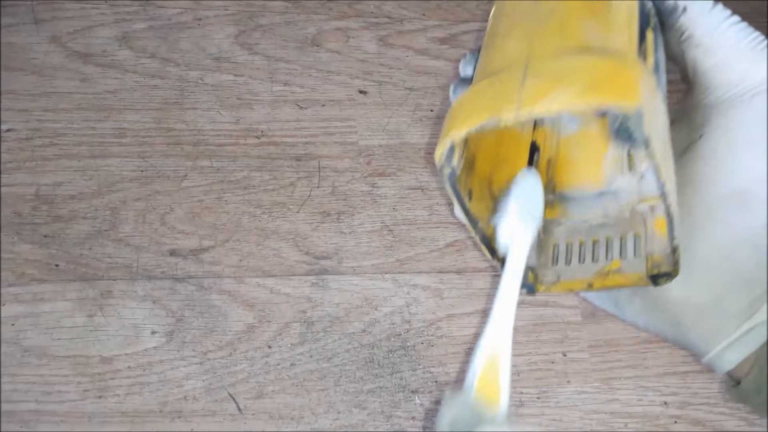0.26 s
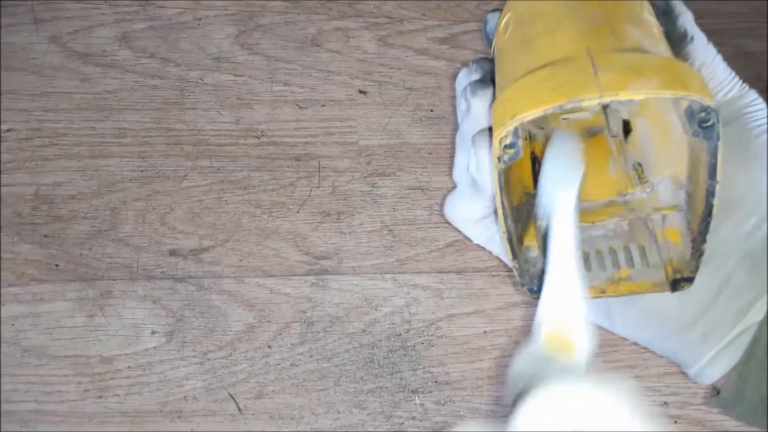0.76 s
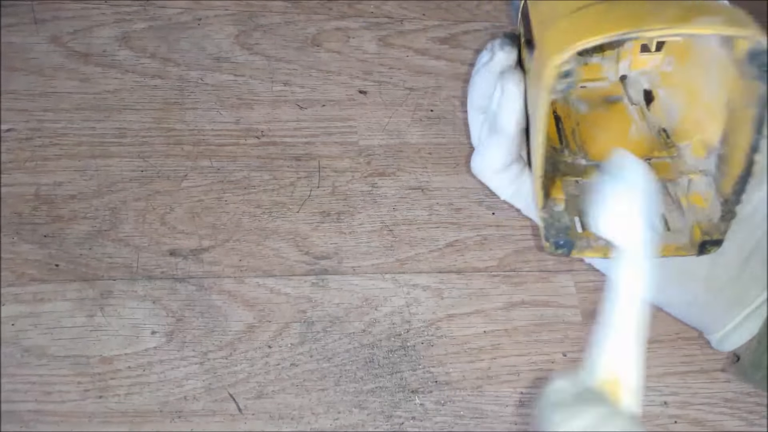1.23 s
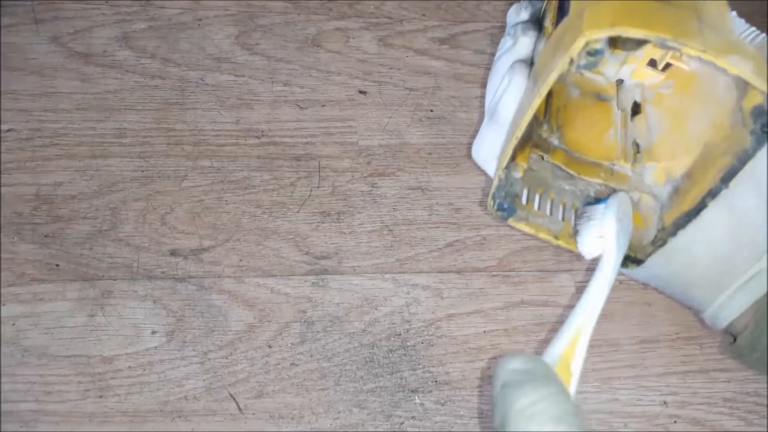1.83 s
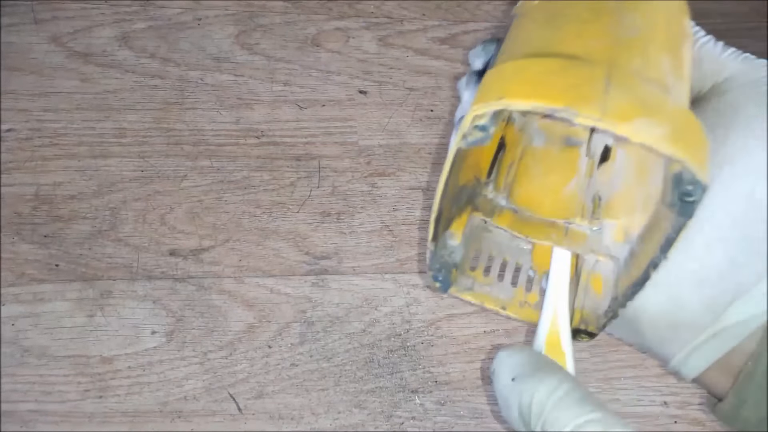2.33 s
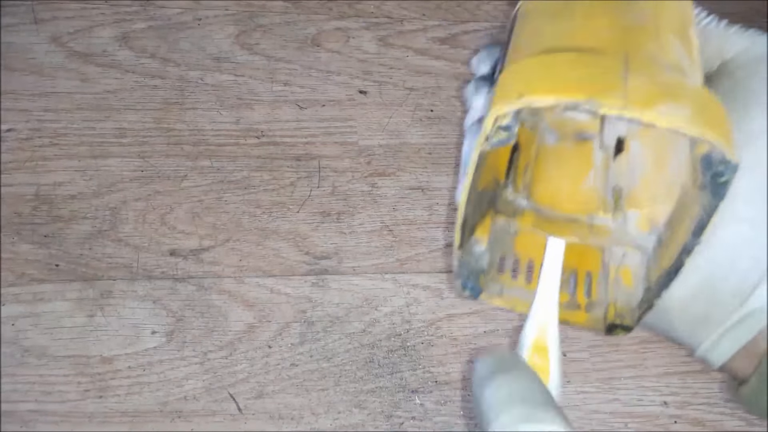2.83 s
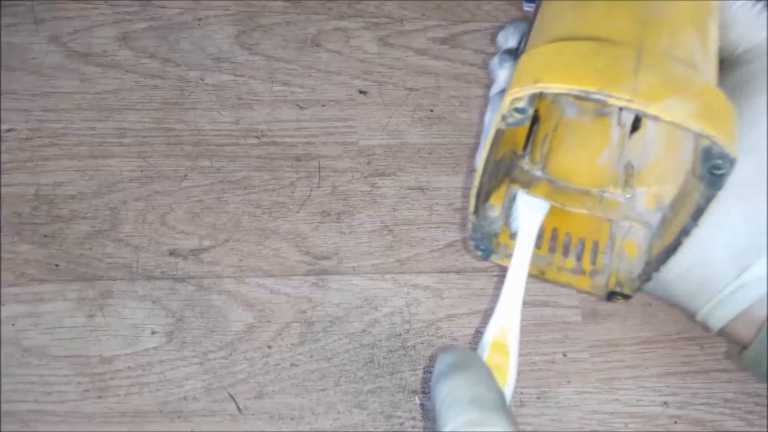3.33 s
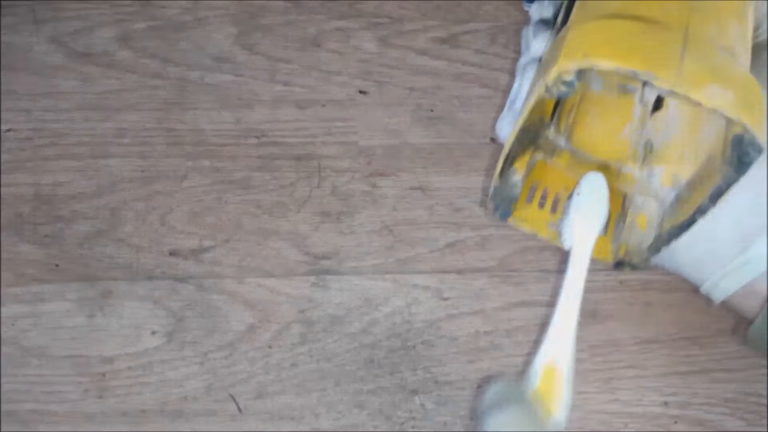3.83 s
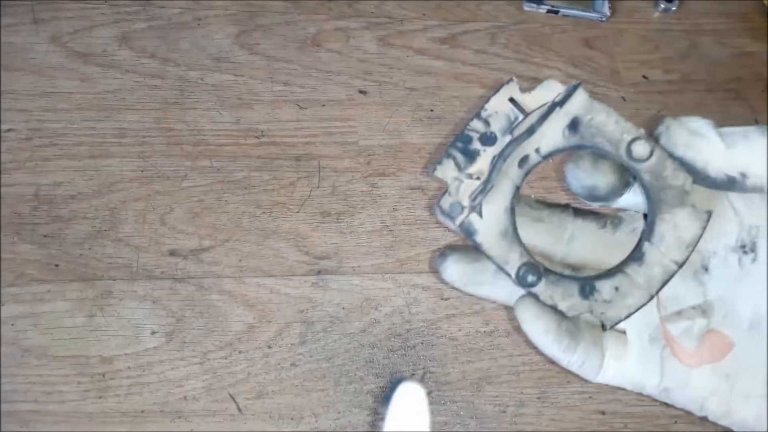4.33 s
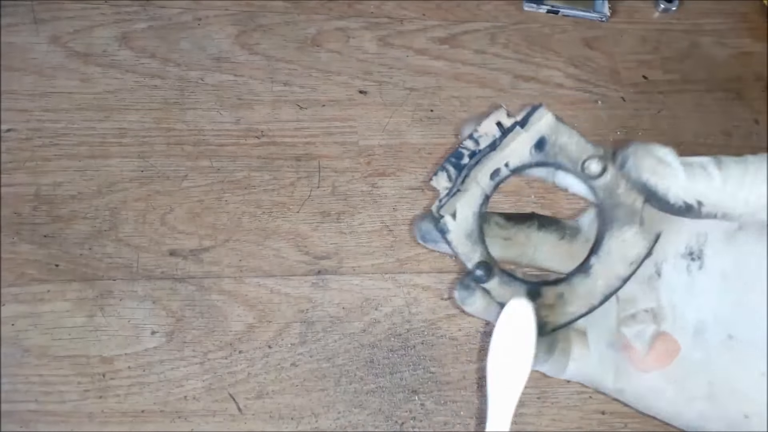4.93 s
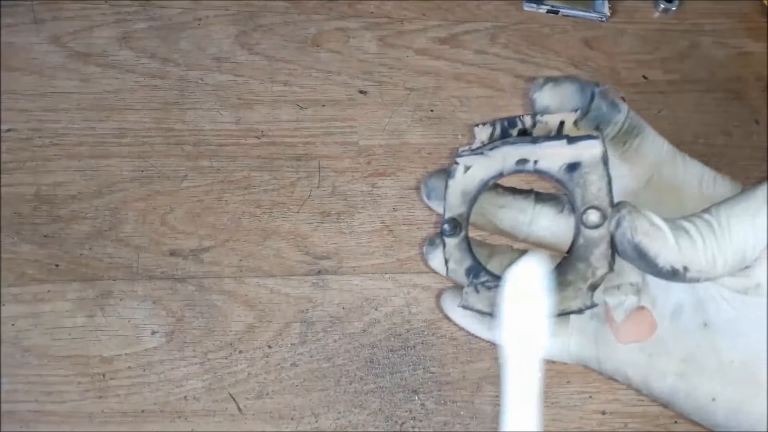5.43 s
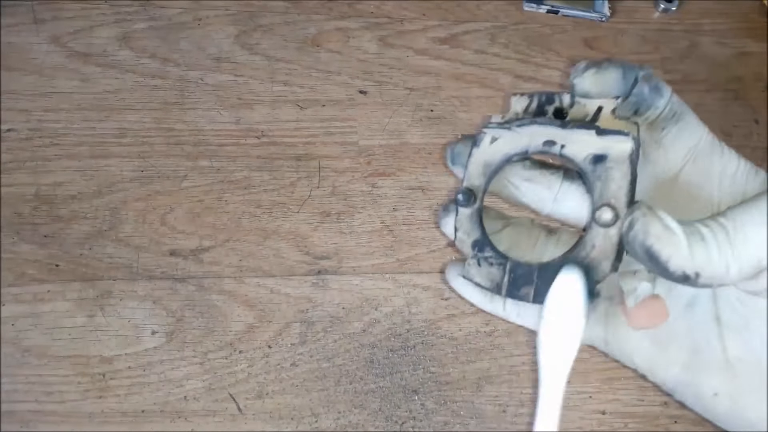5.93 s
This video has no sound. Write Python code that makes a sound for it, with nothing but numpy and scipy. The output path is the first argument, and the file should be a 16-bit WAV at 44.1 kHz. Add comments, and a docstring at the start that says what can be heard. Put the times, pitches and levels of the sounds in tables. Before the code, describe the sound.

From the start, a toothbrush scrubs inside a hollow plastic drill housing, close by, in quick, uneven back-and-forth strokes, bright and scratchy, dotted with clicks as the brush head knocks and snags. A sharp knock comes at about 0.6 seconds and a bright clack of the brush neck at 1 second. A faint, low machine hum in the distance fades by 1.5 seconds. The strokes ease briefly, then continue along the rim from about 1.9 seconds, with a sharp click at 2.5 and the strongest knock near 3.9. At about 4.3 seconds the scrubbing stops, leaving very soft glove rubs and a tiny handling tick. From 5.2 seconds to the end, just after 6, the brush works on a small flat part in quieter, even, thin hissing strokes, about seven a second, with a few light ticks. Faint workshop air lies underneath, with little echo.

```python
"""A toothbrush scrubs a plastic drill housing held in a gloved hand: first deep inside, then along the rim.
Stick-slip friction of the bristles excites the housing's modes; the brush head knocks or snags, and once
the brush neck slaps an edge and rings. After a pause the brush scrubs a small flat part, which mostly
hisses. A part ticks in the hand, the glove rubs softly; behind lie workshop air and a far machine hum."""
import sys
import numpy as np
from scipy import signal
from scipy.fft import rfft, irfft, next_fast_len
from scipy.io import wavfile

SR = 44100
rng = np.random.default_rng(int(sys.argv[2]) if len(sys.argv) > 2 else 0)


def output_pcm(signal):
    """Save a mono or channel-first signal as 16-bit PCM at the path in sys.argv[1].

    Samples are clipped to [-1, 1] before scaling.
    """
    pcm = np.clip(np.atleast_2d(signal).T, -1, 1) * 32767
    wavfile.write(sys.argv[1], SR, np.round(pcm).astype(np.int16))


N = 272538
T = np.arange(N) / SR
RIM_FROM_S, PART_FROM_S = 1.85, 4.5

# Contact shapes the spectrum: push is the gain at 1.6-3.7 kHz, sizzle the gain above 12 kHz.
# strokes on the housing: (time of peak speed [s], length [s], level [dB], push [dB])
HOUSING_STROKES = [(.015, .028, -39.5, 0), (0.073, 0.058, -40.5, -3), (.135, 0.048, -47.5, 0),
                   (.211, 0.085, -37.5, 1), (0.377, 0.066, -39.5, 1), (0.479, .05, -55.5, -2),
                   (0.625, .048, -29.5, -4.5), (.685, .07, -48, -6), (.796, .062, -34, 2.5),
                   (.92, .045, -38, -3), (.958, .042, -34, 4), (1.076, 0.065, -33.5, 2),
                   (1.21, .062, -37.5, -4), (1.329, 0.17, -51, -4.5), (1.468, 0.029, -50, -2),
                   (1.691, .025, -44.5, 4.5), (1.859, .1, -58, -1), (1.936, 0.046, -44.5, 3.5),
                   (1.989, .07, -53, 2.5), (2.11, 0.088, -44, 5.5), (2.285, 0.051, -36, 2.5),
                   (2.356, 0.067, -50.5, 3), (2.533, .05, -30, -3), (2.618, .07, -35, 3),
                   (2.72, 0.077, -56.5, -12), (2.86, .04, -53, -7), (2.949, .05, -33.5, -6),
                   (3.012, .04, -31.5, -6.5), (3.082, .036, -37.5, 0.5), (3.17, .026, -41, -1),
                   (3.207, .048, -42, 0), (3.257, .021, -38, 8.5), (3.298, 0.034, -50.5, 3),
                   (3.464, 0.05, -33.5, 3), (3.552, .09, -51.5, -4), (3.657, .088, -44, 1),
                   (3.803, .076, -35.5, 3.5), (3.956, 0.053, -32, -4), (4.093, .044, -40.5, 3.5),
                   (4.235, .06, -43, 0)]
# friction on each surface:
# (share of a stroke spent speeding up [1], drag [dB], sizzle at 0 dB push [dB], sizzle per push [dB/dB])
HOUSING_FRICTION, PART_FRICTION = (.49, -21.5, -2.2, .3), (.37, -28, 1, .8)
# sharp knocks and ticks: the brush head knocks or snags, or a part ticks in the hand:
# (time [s], level over 1 ms [dB], chatter decay [s], push [dB], sizzle [dB])
KNOCKS_AND_TICKS = [(.3014, -32.5, .008, 6, 2), (0.358, -28.5, 0.0076, -1, -8), (.451, -35, .006, 1.5, 3),
                    (.4901, -43, .003, -13, -5.5), (.563, -35, 0.0046, 0, 0), (.6062, -21.5, .002, -18, -2),
                    (.6316, -6.5, .0022, -2.5, -5), (.7505, -28, .0009, -18, -4),
                    (0.8747, -34, .002, -16, -1), (.8978, -31, .0025, -10, -4.5),
                    (1.0698, -18, .006, -16, -12), (1.1602, -34, .003, -10, -7),
                    (1.1788, -30, .0019, -9, -13), (1.3242, -33, .0007, -8, -12),
                    (1.5505, -40, .0011, 12, 5), (1.7286, -37, .0041, 9.5, -4), (1.8012, -33, .003, 14, -4),
                    (1.8052, -25, .003, 11, -14), (1.8267, -29.5, .0004, -9, -7),
                    (2.1714, -36, .0021, 6, 1), (2.5432, -14.5, .003, 0, 8), (2.6192, -25, .005, -14, 8),
                    (2.6452, -28, .0008, 13, -6), (2.856, -28, .003, 15, -1), (3.0364, -16, .0006, 1, -15),
                    (3.1925, -26.5, .0012, -.5, -15), (3.2253, -35, .003, 15, 7), (3.2535, -32, .005, 9, 4),
                    (3.4449, -23.5, .0017, 16, 9), (3.45, -21.5, .0019, 12, -1),
                    (3.4827, -26.5, .0004, .5, -11), (3.7306, -17, .0004, -1.5, -2),
                    (3.8961, -16, 0.0014, 13, 7), (3.922, -5, 0.005, 3, -7), (3.9701, -26.5, .0013, 6, -10),
                    (4.0328, -32, .005, 5, -3), (4.0398, -28, .0007, 5.5, -15), (4.0524, -32, .001, 5, 3),
                    (4.0827, -15, 0.00055, -1, -10), (4.1093, -28, .003, 0, -6),
                    (4.1882, -31.5, .006, 1, 5), (4.202, -33.5, .0024, 13, 11), (4.315, -41, 0.0037, -3, 7),
                    (4.8825, -41, 0.00031, 1, -6), (5.1788, -32.5, .0036, -9, 3),
                    (5.3523, -40, .0006, -6, -1), (5.4614, -33, .0035, -6, 15), (6.1684, -38, .0035, -4, 0)]
# impacts of the brush neck: (time [s], level over 1 ms [dB])
NECK_SLAPS = [(1.0254, -6.5)]
# modes of the neck: (frequency [Hz], relative level [dB], T60 [s])
NECK_MODES = [(3442, -10.5, 0.034), (4500, -21, .025), (5140, -18, .015), (6550, -2.5, .013),
              (9960, -6.5, .008), (13020, -2, 0.0057), (13900, -4, 0.0058)]
# modes of the housing, relative to its broad response:
# (frequency [Hz], bandwidth [Hz], level touched inside [dB], level touched at the rim [dB])
HOUSING_MODES = [ (480, 110, 12, 6), (700, 120, 4, 2), (1640, 200, 0, 1), (2020, 70, 3, 11),
                 (2270, 140, 5, 9), (3250, 85, 22, 12), (3530, 85, 19, -4), (3630, 130, 0, 3),
                 (4470, 140, -2, 6), (5000, 200, 7, 1), (5230, 160, -6, 2), (5570, 220, -10, 1),
                 (6460, 170, 4, 5), (7400, 200, 6, 4), (8520, 350, 5, -2), (9850, 160, 0, -6),
                 (10600, 180, 3, -8), (11400, 170, -2, 3), (12300, 200, -4, 5), (13250, 150, -6, -1),
                 (13700, 180, -4, 1), (14220, 220, -3, 0)]
# modes of the small part, relative to its broad response: (frequency [Hz], bandwidth [Hz], level [dB])
PART_MODES = [(4740, 360, -11), (10700, 250, 2), (13500, 150, 7), (14200, 270, 1)]
# broad responses of the three surfaces: (frequency [Hz], gain [dB])
INSIDE_RESPONSE = [(100, -39), (450, -20.5), (900, -21), (1400, -20), (2100, -10), (2800, -17.5),
                   (4000, -11), (5800, -7), (7000, -5.5), (9300, -1.5), (14000, 4.5), (15500, 0.5),
                   (17000, -1)]
RIM_RESPONSE = [(100, -32.5), (450, -26), (900, -21.5), (1400, -23), (2000, -12.5), (2800, -12.5),
                (3800, -6.5), (5500, -1.5), (8200, -2), (10500, -1), (13500, 0), (15300, -3), (17000, -21)]
PART_RESPONSE = [(100, -36), (1500, -20.5), (3200, -27), (4500, -17), (6200, -18.5), (8500, -11),
                 (11500, -8.5), (13500, 0), (15000, 1), (15800, -13), (17000, -39)]
# the glove shifts its grip (dull) or slides over the part (bright):
# (time [s], rise [s], fall [s], level [dB], centre frequency [Hz])
GLOVE_RUBS = [(2.225, 0.021, 0.042, -56, 300), (2.397, 0.03, 0.018, -56.5, 269),
              (4.41, 0.072, .05, -65, 12050), (4.61, 0.022, 0.026, -64.5, 8710),
              (4.76, 0.058, 0.067, -63, 249), (4.82, 0.093, .04, -66.5, 10670),
              (4.99, 0.14, 0.095, -68, 7550), (6.06, 0.059, 0.1, -62.5, 253)]
# spectrum of the workshop air: (frequency [Hz], relative spectral density [dB])
AIR_SPECTRUM = [(25, -27), (72, -20), (105, -6.5), (160, -2), (265, -1), (400, -13), (700, -6.5),
                (950, -8.5), (1120, -4), (1350, -13.5), (1600, -15.5), (2150, -14.5), (3200, -25.5),
                (7000, -24.5), (11500, -20), (14300, -14), (16000, -20.5)]
# swell of the low rumble: (time [s], gain [dB])
RUMBLE_SWELL = [(0, 5), (.3, 10), (.65, 9), (1.0, 5), (1.35, 4), (1.7, 2), (3.0, 3.5), (6.18, 4.5)]
# swell and fade of the machine hum: (time [s], level [dB])
HUM_SWELL = [(0, -74), (.2, -64.5), (.4, -56), (.65, -56), (.9, -56.5), (1.15, -66), (1.5, -76.5),
             (2.0, -100)]
# partials of the hum: (frequency [Hz], relative level [dB])
HUM_PARTIALS = [(134, -13.5), (265.5, -0.5), (297, -11.5)]


def scrubbing(size=16384, bass_share=.28, drag_s=.033):
    """Friction noise follows sliding speed; bent bristles drag on at both ends of each stroke."""
    friction = np.pad(unit(bristles() * snags()), size, mode="wrap")
    out = np.zeros(N + 2 * size)
    t = (np.arange(size) - size // 2) / SR
    for s, length, db, push_db in HOUSING_STROKES + part_strokes():
        rise_share, drag_db, base_db, slope = HOUSING_FRICTION if s < PART_FROM_S else PART_FRICTION
        rise, fall = length * rise_share, length * (1 - rise_share)
        drag = undb(drag_db) * swell(t, rise + drag_s, fall + drag_s)
        speed = np.maximum(swell(t, rise, fall), drag)
        sizzle_db = base_db + slope * push_db  # pressed bristles sizzle more
        start = min(int(s * SR) + size // 2, N + size)
        force = friction[start:start + size] * speed
        out[start:start + size] += undb(db) * surface(force, s, bass_share * push_db, push_db, sizzle_db)
    return out[size:-size]


def part_strokes(count=8, first_s=5.194, period_s=.142, length_s=.062, level_db=-46.8):
    """Periodic motion: even strokes over the small part, each with 1 dB less push."""
    return [(first_s + k * period_s, length_s, level_db, -1 - k) for k in range(count)]


def bristles(flicks_per_s=9000, scatter_db=2.5, tuft_db=2.0, tufts_per_s=260, rub_db=-4):
    """Stick-slip friction: bristles release as random, uneven impulses, in tufts, over a smooth rub."""
    slips = (rng.random(N) < flicks_per_s / SR) * rng.choice([-1, 1], N)
    flicks = unit(slips * undb(scatter_db * np.minimum(rng.exponential(size=N), 5)))
    rub = undb(rub_db) * rng.standard_normal(N)
    return unit((flicks + rub) * undb(tuft_db * walk(tufts_per_s)))


def snags(per_s=60, snag_db=8, decay_s=.0007):
    """Elastic release: a bristle catches on an edge and lets go, briefly raising the friction gain."""
    catches = (rng.random(N) < per_s / SR) * rng.random(N)
    return 1 + undb(snag_db) * signal.lfilter([1], [1, -np.exp(-1 / (decay_s * SR))], catches)


def surface(force, s, bass_db, push_db, sizzle_db, thump_db=0):
    """Forced vibration of the surface touched at time s: firm contact drives low modes, tips the top."""
    hz, width, inside_db, rim_db = np.transpose(HOUSING_MODES)
    surfaces = [(INSIDE_RESPONSE, zip(hz, width, inside_db)),
                (RIM_RESPONSE, zip(hz, width, rim_db)),
                (PART_RESPONSE, PART_MODES)]
    outline, modes = surfaces[np.digitize(s, [RIM_FROM_S, PART_FROM_S])]
    contact = [(500, bass_db + thump_db), (1000, bass_db), (1600, push_db), (3700, push_db),
               (5200, 0), (9000, 0), (12000, sizzle_db)]
    return signal.fftconvolve(force, body_response(outline, modes, contact))[:len(force)]


def body_response(outline, modes, contact, ripple_db=2.4, size=2048, ripple_count=90):
    """Modal superposition: resonances on a broad response give an impulse response of unit energy."""
    f = np.fft.rfftfreq(size, 1 / SR)
    peaks = sum(undb(db) ** 2 / (1 + (2 * (f - hz) / width) ** 2) for hz, width, db in modes)
    # the crowd of small treble modes answers strongly or weakly depending on the spot touched
    ripple = np.interp(f, np.linspace(0, SR / 2, ripple_count), rng.standard_normal(ripple_count))
    ripple *= np.interp(f, [3000, 5000], [.3, 1])
    gain = contour(outline, size) * contour(contact, size) * np.sqrt(1 + peaks) * undb(ripple_db * ripple)
    # folding the cepstrum gives a causal, minimum-phase response
    cepstrum = irfft(np.log(gain))
    cepstrum[1:size // 2] *= 2
    cepstrum[size // 2 + 1:] = 0
    response = irfft(np.exp(rfft(cepstrum)))
    return response / np.linalg.norm(response)


def knocks_and_ticks(size=2048, snap=3, rattle_db=-18, rattle_s=.011, graze_db=-18, graze_s=.0016,
                     thump_from_db=-15, thump_share=.45):
    """Impulsive excitation: each knock, snag or handling tick grazes, snaps, chatters and rattles out."""
    out, lead = np.zeros(N + size), size // 8
    t = np.abs(T[:size] - T[lead])
    for s, db, decay, push_db, sizzle_db in KNOCKS_AND_TICKS:
        graze = undb(graze_db) * np.exp(-t[:lead] / graze_s)
        chatter = np.exp(-t[lead:] / decay) + undb(rattle_db) * np.exp(-t[lead:] / rattle_s)
        blow = rng.choice([-1, 1], size) * np.concatenate([graze, chatter])
        blow[lead] = snap
        bass_db = -2.8 + .65 * push_db  # a square blow thuds, a glancing one only ticks
        thump_db = thump_share * max(db - thump_from_db, 0)  # heavy blows move the whole hollow shell
        knock = surface(blow, s, bass_db, push_db, sizzle_db, thump_db)
        start = int(s * SR) - lead
        out[start:start + size] += undb(db) * over_1ms(knock)
    return out[:N]


def neck_slap(crack_db=-5, crack_s=.0031, cutoff_hz=3100):
    """Damped free vibration: the stiff neck cracks and rings, too thin to radiate bass."""
    t = T[:SR // 10]
    ring = sum(undb(db - 60 * t / t60) * np.sin(2 * np.pi * hz * t) for hz, db, t60 in NECK_MODES)
    crack = undb(crack_db) * rng.standard_normal(len(t)) * np.exp(-t / crack_s)
    highpass = signal.butter(5, cutoff_hz, "high", fs=SR, output="sos")
    clack = over_1ms(signal.sosfilt(highpass, ring + crack))
    hits = np.zeros(N)
    for s, db in NECK_SLAPS:
        hits[int(s * SR)] = undb(db)
    return signal.fftconvolve(hits, clack)[:N]


def glove(skirt_db=-13, halting_db=3):
    """Sliding friction: each soft, halting rub of the glove is a broad band of noise."""
    out = np.zeros(N)
    for s, rise, fall, db, hz in GLOVE_RUBS:
        slips = rng.standard_normal(N) * undb(halting_db * walk(120))
        band = [(hz / 3, -40), (hz / 2, skirt_db), (hz, 0), (hz * 2, skirt_db), (hz * 10, -50)]
        out += undb(db) * unit(colour(slips, band)) * swell(T - s, rise, fall)
    return out


def room(x, first_s=.0024, t60_s=.19, level_db=-14):
    """Reverberation: diffuse reflections from the bench and near walls decay exponentially."""
    t = T[:SR // 2]
    tail = rng.standard_normal(len(t)) * undb(-60 * t / t60_s) * (t > first_s)
    tail = colour(tail, [(500, 2), (5000, -1), (15000, -1)])
    return undb(level_db) * signal.fftconvolve(x, tail / np.linalg.norm(tail))[:N]


def workshop_air(air_db=-64.5, rumble_hz=750, flicker_db=1):
    """Ambient noise: steady air whose low band is amplitude-modulated into a swelling rumble."""
    air = undb(AIR_DB := air_db) * unit(colour(rng.standard_normal(N), AIR_SPECTRUM))
    low = signal.sosfiltfilt(signal.butter(2, rumble_hz, fs=SR, output="sos"), air)
    rumble = low * undb(curve(RUMBLE_SWELL) + flicker_db * walk(7.3))
    return air - low + rumble


def machine_hum(pitch_wander=.0026, flicker_db=.99):
    """Line spectrum of a far machine: its partials waver together in pitch and level."""
    phase_per_hz = 2 * np.pi * np.cumsum(1 + pitch_wander * walk(4)) / SR
    hum = sum(undb(db) * np.sin(hz * phase_per_hz) for hz, db in HUM_PARTIALS)
    return unit(hum) * undb(curve(HUM_SWELL) + flicker_db * walk(6.5))


def swell(t, rise, fall, squareness=2.7):
    """Speed of a hand movement that peaks at t = 0."""
    return np.exp(-np.abs(t / np.where(t < 0, rise, fall)) ** squareness)


def walk(rate):
    """Random wander through `rate` values a second, with a spread near 1."""
    return 1.34 * np.interp(T * rate, np.arange(N), rng.standard_normal(N))


def curve(rows):
    """Linear interpolation of (time [s], value) rows."""
    return np.interp(T, *np.transpose(rows))


def contour(points, size):
    """Gain of a (frequency [Hz], gain [dB]) outline at the bins of a transform."""
    hz, db = np.transpose(points)
    return undb(np.interp(np.log(np.fft.rfftfreq(size, 1 / SR) + 1), np.log(hz), db))


def colour(x, points):
    """Filtering: multiply the spectrum by a (frequency [Hz], gain [dB]) outline."""
    size = 2 * next_fast_len(len(x) // 2 + 1)
    return irfft(rfft(x, size) * contour(points, size))[:len(x)]


def undb(db):
    """Decibels to amplitude ratio."""
    return 10 ** (np.asarray(db) / 20)


def unit(x):
    """Scale to an rms of 1."""
    return x / np.sqrt(np.mean(x ** 2))


def over_1ms(hit):
    """Scale a hit to the energy of one millisecond at an rms of 1."""
    return hit * np.sqrt(SR / 1000) / np.linalg.norm(hit)


def scene():
    """Superposition of the direct sound of brushing and handling, its reverberation and the background."""
    direct = scrubbing() + knocks_and_ticks() + neck_slap() + glove()
    return (direct + room(direct) + workshop_air() + machine_hum())[None]


def record(dry):
    """Clipping at full scale, then a steep low-pass at 15.6 kHz."""
    lowpass = signal.ellip(8, .2, 95, 15600, fs=SR, output="sos")
    return signal.sosfilt(lowpass, np.clip(dry, -1, 1))


dry = scene()
out = record(dry)
output_pcm(out)
```